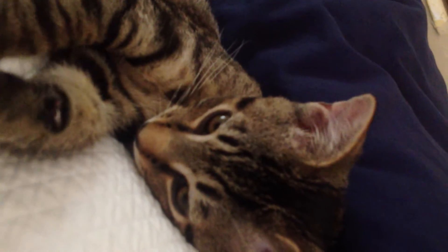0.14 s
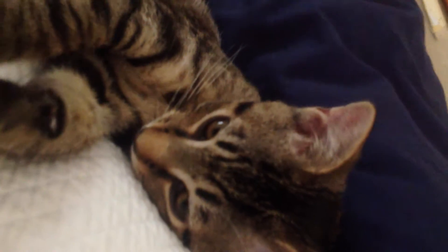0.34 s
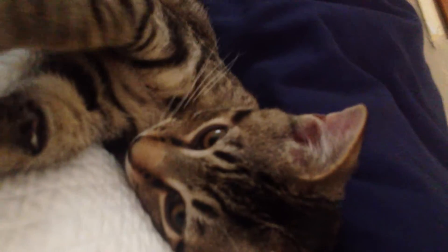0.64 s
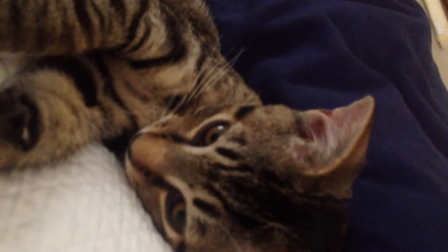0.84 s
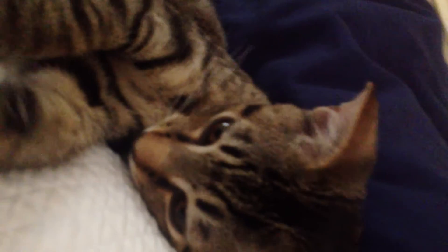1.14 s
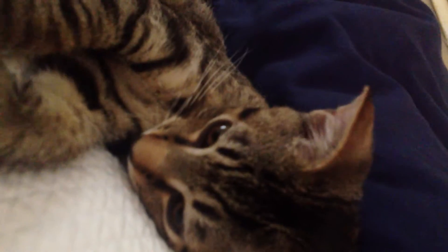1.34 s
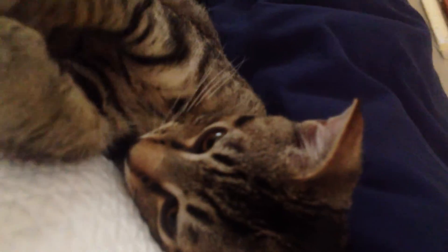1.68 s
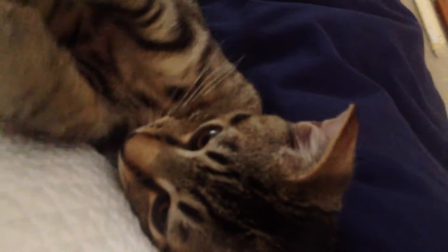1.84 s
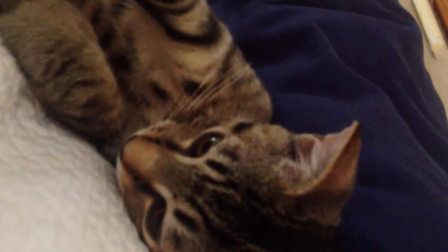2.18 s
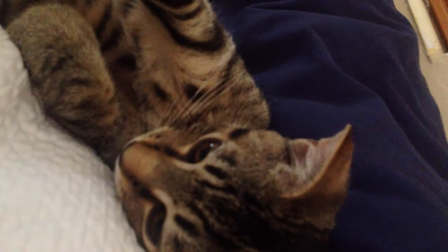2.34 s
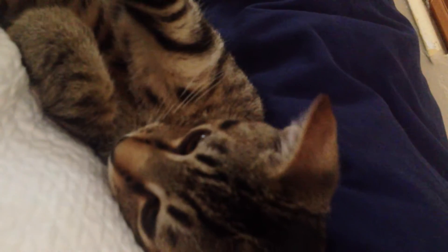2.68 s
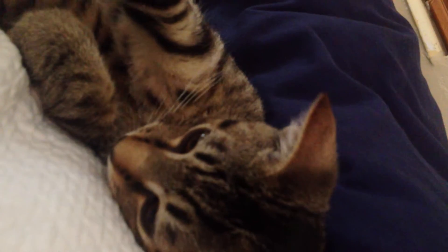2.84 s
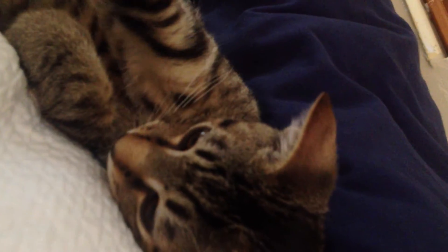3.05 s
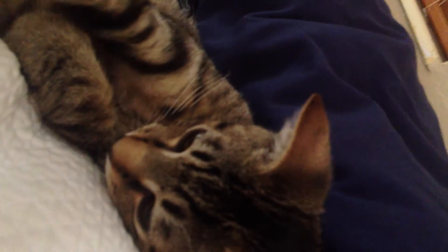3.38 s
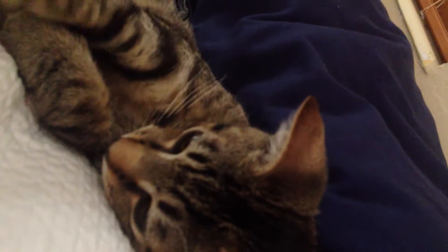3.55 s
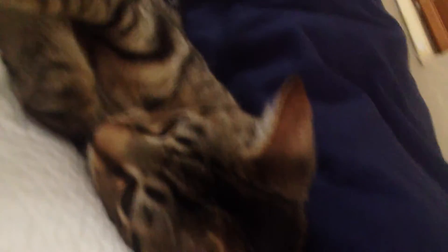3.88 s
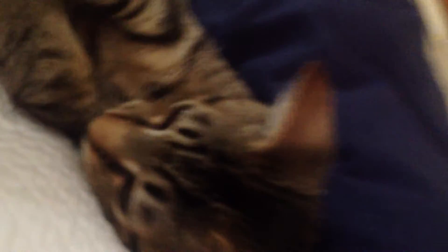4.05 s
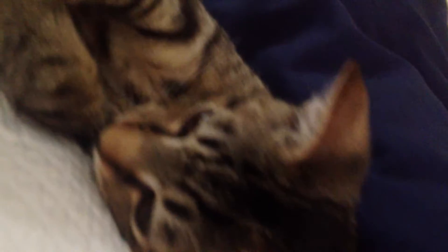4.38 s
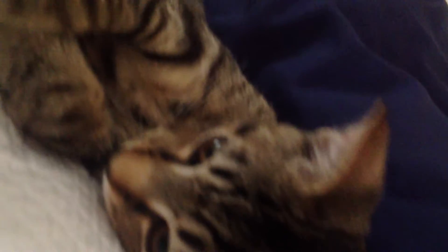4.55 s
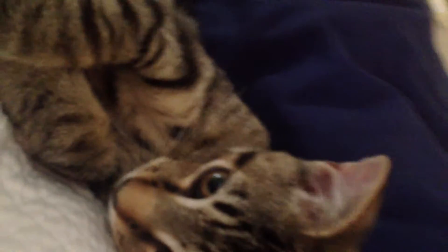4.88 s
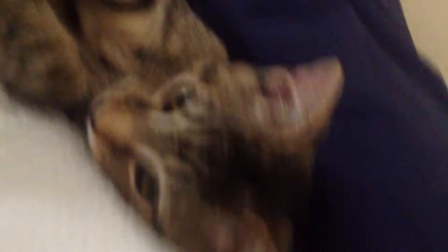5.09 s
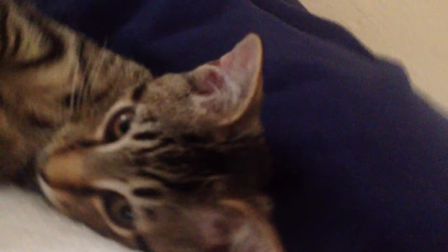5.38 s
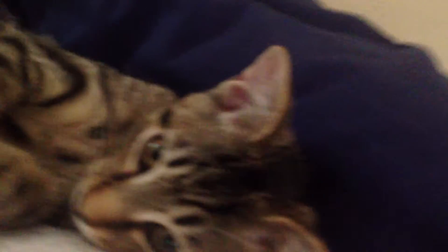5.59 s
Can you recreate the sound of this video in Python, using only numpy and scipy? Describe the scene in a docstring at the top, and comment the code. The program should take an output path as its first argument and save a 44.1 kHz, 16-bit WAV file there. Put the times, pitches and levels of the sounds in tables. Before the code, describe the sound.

A kitten purrs softly, close to a handheld microphone in a quiet bedroom, the purr swelling and pausing with each breath. About a second in, seven sharp, wet clicks, like a tongue calling for attention, ring briefly in the room. The purr carries on, turning quicker and rougher. Near the end, bedding rustles faintly with a few soft handling thuds, and one loud, rattling knock hits the microphone.

```python
"""Kitten purring on a bed

A kitten purrs softly, close to a handheld camera in a quiet bedroom: each cycle of its larynx
thumps in the chest and ticks in the throat. Seven sharp clicks, perhaps a tongue calling for its
attention, ring in the room. Bedding rustles as it turns its head, and something bumps the camera."""
import sys
import numpy as np
from scipy import signal
from scipy.fft import rfft, irfft, next_fast_len
from scipy.io import wavfile

SR = 44100
rng = np.random.default_rng(int(sys.argv[2]) if len(sys.argv) > 2 else 0)


def master_out(mix):
    """Clip the mix to full scale and print it as 16-bit PCM to the path in sys.argv[1]."""
    frames = np.transpose(np.atleast_2d(mix))
    ceiling = np.clip(frames, -1, 1)
    pcm = np.round(ceiling * 32767).astype(np.int16)
    wavfile.write(sys.argv[1], SR, pcm)


N = 252428

# The purr changes stroke as the air reverses or stalls: (start [s], end [s], pulse rate [Hz],
# tick delay [s], tick level [dB], roughness [0-1], mid-stroke effort [dB], swell [dB/s])
STROKES = [(0.016, 0.424, 28.15, 0.0125, -1, 0.14, -64, 6.5),
           (0.416, 1.097, 28.5, 0.0095, -2, 0.36, -69.5, 8),
           (1.173, 1.708, 28.7, 0.013, -0.5, 0.19, -63.5, 1),
           (1.724, 2.368, 30.8, 0.0089, -3, 0.15, -72, 9), (2.404, 2.92, 29.6, 0.0095, 1, 0.09, -65.5, -7),
           (3.030, 3.234, 33.2, 0.014, -1.5, 0.37, -65, -23),
           (3.243, 3.37, 31.5, 0.013, -0.5, 0.4, -64.5, 18),
           (3.398, 3.616, 33.3, 0.013, -3.5, 0.34, -70, 3),
           (3.676, 4.175, 29.45, .012, 1.5, 0.09, -65.3, 9), (4.222, 4.55, 41.4, 0.014, -1, 0.39, -63.5, 2),
           (4.529, 4.81, 38.9, 0.013, 0, 0.31, -65.5, 3), (4.842, 5.412, 39.2, 0.016, -0.5, 0.38, -65.5, 5),
           (5.585, 5.777, 35.3, 0.012, -1, 0.45, -65.5, -8)]
# The purr catches in a harder pulse: (time [s], level [dB])
CATCHES = [(2.517, -57.5), (3.0659, -56), (3.284, -60), (4.313, -55), (4.471, -57.5), (4.577, -59),
           (5.297, -51.5), (5.357, -60)]
# Body of the thump and tone of the tick: (frequency [Hz], width [Hz], gain [dB])
CHEST_MODES = [(192, 84, -1.5), (260, 510, -12), (517, 920, -6.5), (700, 320, -6)]
THROAT_MODES = [(229.6, 75, 3.5), (485, 705, -1), (674, 210, 3.5), (900, 98, -21), (1740, 600, -12.5)]
# Colour of the rasp and of the airy hiss under it: (frequency [Hz], level [dB])
RASP_SPECTRUM = [(100, -30), (260, 3), (400, -10), (750, -11), (1100, -11.5), (1750, -12.5), (2500, -21.5),
                 (8000, -28.5)]
NOSE_SPECTRUM = [(1000, -27), (1700, 0), (2400, -17), (6000, -26)]


def purr():
    """Each cycle of the larynx gives a dull thump, then a brighter tick; rough strokes leak air."""
    thumps, ticks, leak = np.zeros((3, N))
    leak_decay = np.exp(-np.arange(SR // 25) / SR / 0.005)
    murmur_db = -14.5  # weak stray beats between the main pulses
    for start, end, rate, delay, tick_db, rough, *_ in STROKES:
        cycles = zip(np.arange(start, end, 1 / rate), rng.standard_normal((32, 4)), rng.random(32))
        for s, (jitter, thump_spread, tick_spread, murmur_spread), stray_phase in cycles:
            s += 0.002 * rough * jitter
            thump = amp((2 + 2 * rough) * thump_spread)
            tick = amp(tick_db + 1.9 * tick_spread)
            murmur = amp(murmur_db + 3 * murmur_spread)
            add(thumps, s, thump * puff(0.00023))
            add(ticks, s, 0.63 * thump * puff(0.00014))  # the thump also reaches the throat
            add(ticks, s + delay, tick * puff(0.00014))
            add(ticks, s + stray_phase / rate, murmur * puff(0.00022))
            add(leak, s, rough * thump * leak_decay)
            add(leak, s + delay, 0.73 * rough * tick * leak_decay)
    accents = throat_catches()
    chest = amp(-5) * unit(ring(thumps, CHEST_MODES))
    throat = amp(-2.5) * unit(ring(ticks, THROAT_MODES))
    rasp = amp(-8) * unit(leak * noise(RASP_SPECTRUM))
    nose = amp(-20) * noise(NOSE_SPECTRUM)
    return effort() * (chest + throat + rasp + nose) + accents


def effort(attack_s=0.055, release_s=0.057, lull_db=-7):
    """The purr's gain envelope: each stroke rises out of a lull, swells or sags, and lets go."""
    t = np.arange(N) / SR
    db = np.full(N, -90.0)
    for start, end, *_, mid_db, swell in STROKES:
        held = np.clip(np.minimum((t - start) / attack_s, (end - t) / release_s), 0, 1)
        from_middle = np.minimum(t, end) - (start + end) / 2
        stroke_db = mid_db + swell * from_middle + lull_db * (1 - held)
        db = np.where(t >= start, stroke_db, db)
    return amp(db)


def throat_catches(rebound_s=0.029, rebound_db=-5.5):
    """A hard pulse rings the throat, and a weaker one follows a cycle later."""
    track = np.zeros(N)
    for s, db in CATCHES:
        for k in range(2):
            pulse = np.convolve(strike(THROAT_MODES, scrape=0.081, decay_s=0.0014), puff(0.0001))
            add(track, s + k * rebound_s, amp(db + 7 + k * rebound_db) * pulse)
    return track


# Wet clicks: (time [s], snap level [dB], parting lead [s], parting level [dB], hollow pitch [Hz],
# brightness [dB per half decade], crack of the lowest cavity mode [dB], room splash centre [Hz])
CLICKS = [(1.1464, -27, 0.00078, -36.5, 770, 1, -5, 6530), (1.304, -36, 0.0052, -38, 980, 0.5, 0.5, 7000),
          (1.4489, -30, 0.0049, -40, 960, 0, -2.5, 7500), (1.587, -32.5, 0.0037, -36, 544, 1, 1, 9500),
          (1.722, -24, .0028, -33.5, 890, 4, 1.5, 8600), (1.868, -27, .004, -35.5, 710, 1, 2.5, 7400),
          (2.0194, -38.5, 0.0026, -43, 1030, -1, 0.5, 7400)]
# The last click ends in a hollow pop: (time [s], level [dB], pitch [Hz])
POPS = [(2.0251, -41, 1110)]


def clicks():
    """Each click is a light, dull parting and then the main snap; the last one ends hollow."""
    track = np.zeros(N)
    for s, db, lead, parting_db, hollow_hz, bright_db, crack_db, splash_hz in CLICKS:
        parting = snap(0.64 * hollow_hz, bright_db - 3, crack_db, 0.51 * splash_hz)
        add(track, s - lead, amp(parting_db) * parting)
        add(track, s, amp(db) * snap(hollow_hz, bright_db, crack_db, splash_hz))
    for s, db, hz in POPS:
        add(track, s, amp(db) * strike([(hz, 200, 0)], scrape=0.048, decay_s=0.0017))
        add(track, s, amp(db - 8.5) * room_tail(hz, splash_db=23, octaves=0.45))
    return track


# The small, bright cavity behind a snap: (frequency [Hz], width [Hz], gain [dB])
CAVITY_MODES = [(2420, 1000, -5.5), (4170, 2900, -11.5), (7400, 470, 1.5), (8740, 700, -1.5),
                (10200, 2400, -7), (13800, 560, -14)]


def snap(hollow_hz, bright_db, crack_db, splash_hz):
    """A wet snap rings a small cavity and a lower hollow, then splashes around the room."""
    modes = []
    for k, (hz, width, db) in enumerate(CAVITY_MODES + [(hollow_hz, 480, -6)]):
        tilt_db = 2 * bright_db * np.log10(hz / 3000)  # a quicker release favours the high modes
        modes.append((hz, width, db + tilt_db + crack_db * (k == 0)))
    transient = amp(-2) * strike(modes, scrape=0.022, decay_s=0.00035)
    fizz = amp(-6) * strike(modes, scrape=3, decay_s=0.0019)  # the surfaces part
    sound = amp(-13) * room_tail(splash_hz, splash_db=9.5, octaves=0.63)
    add(sound, 0, transient + fizz)
    return sound


# Colour of the bedroom's reverb: (frequency [Hz], level [dB])
WALL_SPECTRUM = [(150, -9), (500, 7), (1000, 1.5), (1600, -1), (2500, 3), (3300, -2), (4500, 0.5),
                 (5600, -5), (8000, -2.5), (11000, -6.5), (15000, -5.5)]
# Length of its tail: (frequency [Hz], time to fall 60 dB [s])
ROOM_DECAY = [(200, 0.19), (1000, 0.3), (2600, 0.39), (7000, 0.37), (15000, 0.24)]


def room_tail(splash_hz, splash_db, octaves):
    """The walls answer a snap, boosted around its splash pitch; the upper mids ring longest."""
    hz, t, spectrogram = signal.stft(rng.standard_normal(SR // 2), SR, nperseg=256)
    splash = splash_db * np.exp(-(np.log2((hz + 1) / splash_hz) / octaves) ** 2)
    colour_db = along(WALL_SPECTRUM, hz) + splash
    decay_db = 60 * t / along(ROOM_DECAY, hz)[:, None]
    tail = signal.istft(spectrogram * amp(colour_db[:, None] - decay_db), SR, nperseg=256)[1]
    tail *= 1 - np.exp(-np.arange(len(tail)) / SR / 0.001)  # reflections take a moment to arrive
    return unit_hit(tail)


# Bright rattle of the camera's case: (frequency [Hz], width [Hz], gain [dB])
CASE_MODES = [(1110, 180, -5.5), (1607, 91, 2.5), (2180, 230, -0.5), (2760, 330, 2.5), (3040, 340, 3),
              (4300, 450, -4.5), (6940, 870, -19), (12100, 1200, -30.5)]


def camera_knock(start_s=5.4741, level_db=-22, gap_s=0.0076, scatter_s=0.0005, loss_db=4.5):
    """One hard knock rattles the case in a dying stutter; each contact also shoves the grip."""
    track = np.zeros(N)
    for k, jitter in enumerate(rng.standard_normal(5)):
        s = start_s + k * gap_s + (k > 0) * scatter_s * jitter
        rattle = strike(CASE_MODES, scrape=0.14, decay_s=0.0024)
        dead_shove = amp(-13) * strike([(190, 200, 1), (630, 450, 0.5)], scrape=0.039, decay_s=0.0014)
        add(track, s, amp(level_db - k * loss_db) * (rattle + dead_shove))
    return track


# Thuds on the camera, soft at first and hard in the knock: (time [s], level [dB])
BUMPS = [(4.584, -47), (4.608, -49), (4.629, -50), (4.711, -50.5), (5.277, -46), (5.305, -49),
         (5.479, -25.5), (5.4828, -25.5), (5.489, -30.5), (5.503, -31.5)]
# Low ring of the camera's body: (frequency [Hz], width [Hz], gain [dB])
BODY_MODES = [(241, 47, 16), (440, 310, -11), (670, 55, -4.5)]
# Small handling ticks: (time [s], level [dB], low knock trim [dB])
HANDLING_TICKS = [(0.5481, -52, -6), (0.563, -63, 4), (4.885, -60, -11), (5.536, -53.5, -22)]


def camera_handling():
    """Touches thud through the camera's body; the lightest only tick."""
    track = np.zeros(N)
    for s, db in BUMPS:
        thud = np.convolve(strike(BODY_MODES, scrape=0.076, decay_s=0.0032), puff(0.000052))
        add(track, s, amp(db) * thud)
    for s, db, knock_db in HANDLING_TICKS:
        modes = [(545, 350, knock_db + 18), (4000, 2600, 0)]
        add(track, s, amp(db) * strike(modes, scrape=0.11, decay_s=0.0012))
    return track


# Fur slides over the bedding: (peak time [s], rise [s], fall [s], cloth level [dB], pillow level [dB])
RUSTLES = [(2.10, .03, 0.054, -71.5, -76), (2.215, 0.05, 0.068, -65.5, -93),
           (4.885, .004, .025, -62.5, -80), (4.97, .06, 0.12, -66.5, -76), (5.097, 0.056, 0.11, -62, -60),
           (5.224, .04, 0.066, -60.5, -78), (5.31, .03, .045, -69, -65)]
# Crisp cloth and muffled pillow: (frequency [Hz], level [dB])
CLOTH_SPECTRUM = [(150, -5), (400, 2.5), (800, -7.5), (1600, -11), (2700, -14), (3600, -11), (4500, -5),
                  (5500, -18.5), (7500, -11), (10000, -22), (13500, -16), (15500, -29)]
PILLOW_SPECTRUM = [(300, -24), (900, -4.5), (1250, -10.5), (1600, -5.5), (2200, -12), (2900, -14),
                   (5000, -18), (15000, -45)]


def rustle():
    """Each movement gathers speed and dies away, brushing the cloth and pressing into the pillow."""
    t = np.arange(N) / SR
    power = np.zeros((2, N))
    for s, rise, fall, cloth_db, pillow_db in RUSTLES:
        speed = np.exp(-np.abs(t - s) / np.where(t < s, rise, fall))
        power += (amp([[cloth_db], [pillow_db]]) * speed) ** 2
    cloth, pillow = np.sqrt(power)
    return cloth * weave(CLOTH_SPECTRUM) + pillow * weave(PILLOW_SPECTRUM)


def weave(spectrum, snags_per_s=3000):
    """Fur drags over the weave in many tiny snags."""
    snags = rng.standard_normal(N) * (rng.random(N) < snags_per_s / SR)
    return unit(filtered(snags, lambda hz: amp(along(spectrum, hz))))


# The hush under everything: (frequency [Hz], level [dB])
ROOM_TONE_SPECTRUM = [(25, -3), (50, -2.5), (100, -5.5), (200, 6.5), (290, -2.5), (400, -10.5), (780, -8),
                      (1100, -14.5), (3000, -17.5), (4700, -17.5), (6000, -19), (8400, -19), (9800, -27),
                      (13500, -20)]


def room_tone():
    """Room air and microphone hiss make a faint, steady bed."""
    return amp(-67) * noise(ROOM_TONE_SPECTRUM)


def strike(modes, scrape, decay_s):
    """An impulse and a dying scrape ring a body."""
    t = np.arange(SR // 20) / SR
    force = scrape * rng.standard_normal(len(t)) * np.exp(-t / decay_s)
    force[0] += 1
    return unit_hit(ring(force, modes))


def ring(x, modes):
    """Pass x through a body's resonances, summed with alternating polarity."""
    return filtered(x, lambda f: sum((-1) ** k * amp(db) * 1j * f * width / (hz**2 - f**2 + 1j * f * width)
                                     for k, (hz, width, db) in enumerate(modes)))


def puff(width_s):
    """A smooth push of air of area about 1; the shorter, the brighter."""
    age = np.arange(SR // 50) / SR / width_s
    return age * np.exp(-age) / (width_s * SR)


def noise(spectrum):
    """Noise of rms 1 with a given colour."""
    return unit(filtered(rng.standard_normal(N), lambda hz: amp(along(spectrum, hz))))


def filtered(x, response):
    """Filter x by a complex frequency response."""
    size = next_fast_len(len(x) + SR // 4)
    return irfft(rfft(x, size) * response(np.fft.rfftfreq(size, 1 / SR)), size)[:len(x)]


def along(points, hz):
    """Read a curve on a log frequency axis."""
    freqs, values = np.transpose(points)
    return np.interp(np.log(hz + 1), np.log(freqs + 1), values)


def add(track, s, sound):
    """Mix a sound into a track at a time."""
    part = track[max(0, round(s * SR)):][:len(sound)]
    part += sound[:len(part)]


def amp(db):
    """Decibels to gain."""
    return 10 ** (np.asarray(db) / 20)


def unit(x):
    """Scale to rms 1."""
    return x / np.sqrt(np.mean(x ** 2) + 1e-20)


def unit_hit(x):
    """Scale to the energy of 2 ms at rms 1."""
    return x / np.linalg.norm(x) * np.sqrt(SR / 500)


def scene():
    """Kitten and handling are close and dry over the bedroom's hush; only the clicks have reverb."""
    return (purr() + clicks() + camera_knock() + camera_handling() + rustle() + room_tone())[None]


def record(dry, low_cut_hz=125, top_hz=15400):
    """The small microphone loses the deep bass; the camera keeps nothing above its band limit."""
    thin = signal.sosfilt(signal.butter(2, low_cut_hz, "highpass", fs=SR, output="sos"), dry)
    return np.array([filtered(channel, lambda hz: hz < top_hz) for channel in thin])


dry = scene()
out = record(dry)
master_out(out)
```